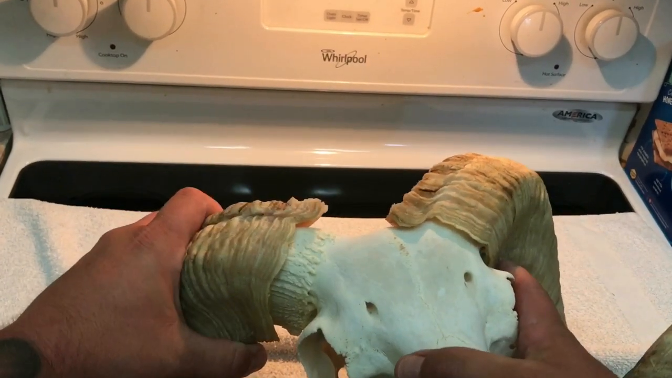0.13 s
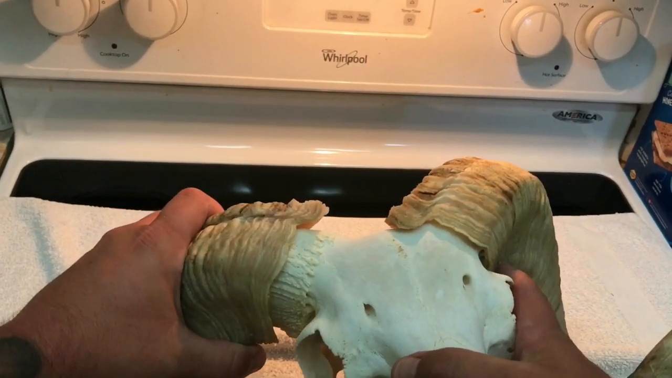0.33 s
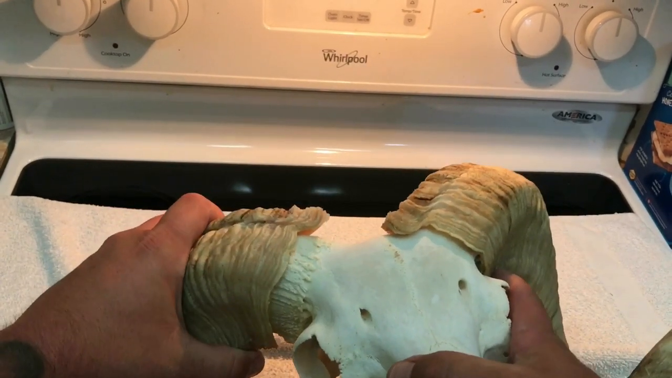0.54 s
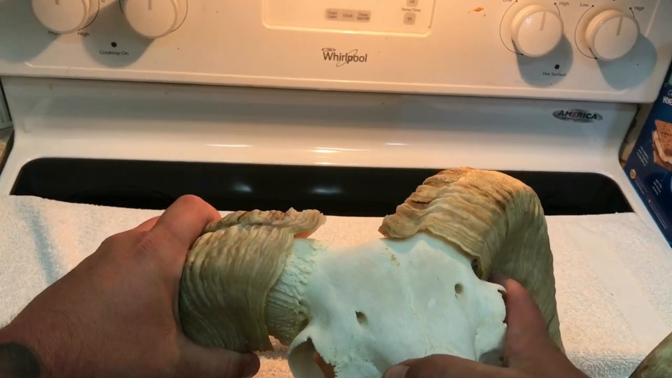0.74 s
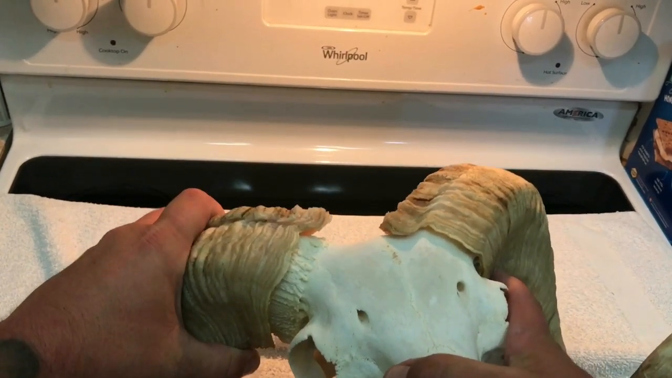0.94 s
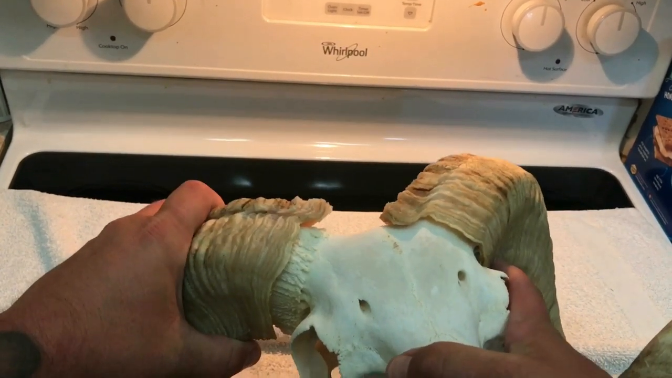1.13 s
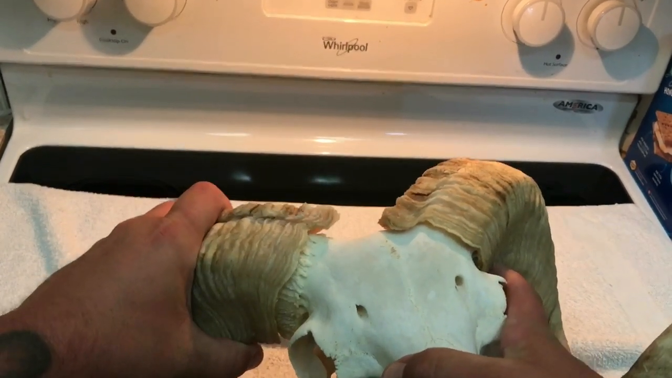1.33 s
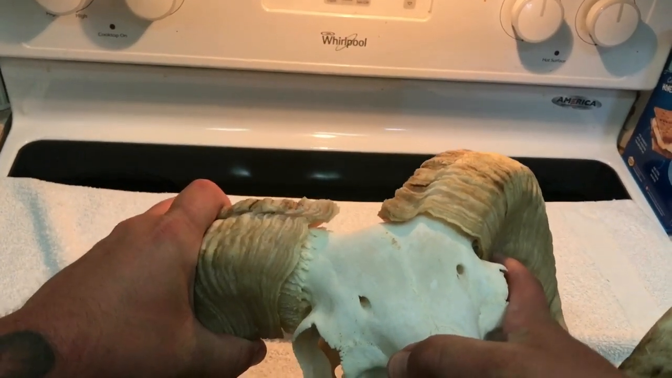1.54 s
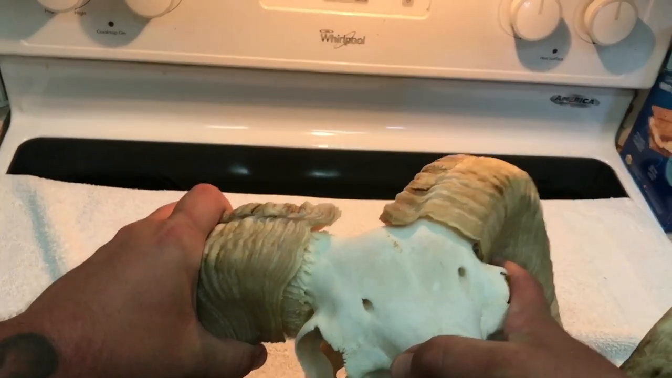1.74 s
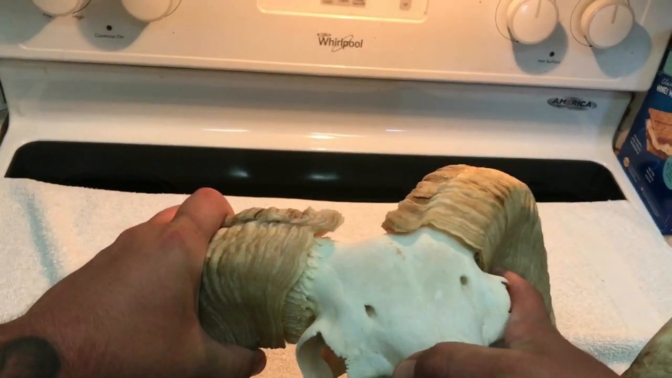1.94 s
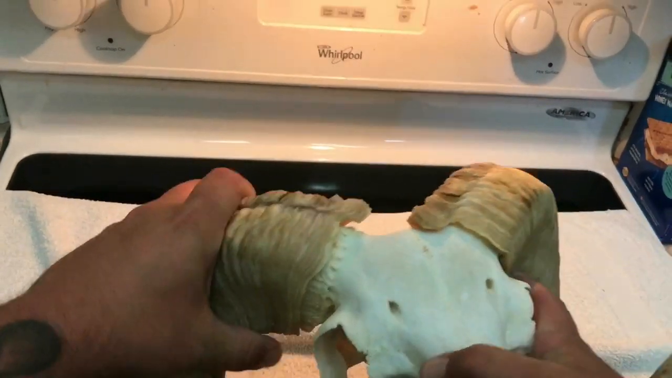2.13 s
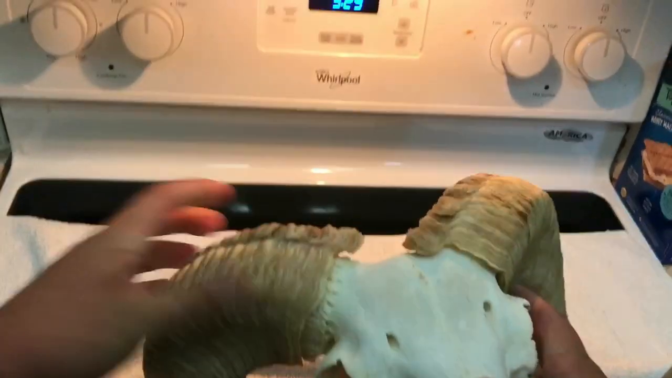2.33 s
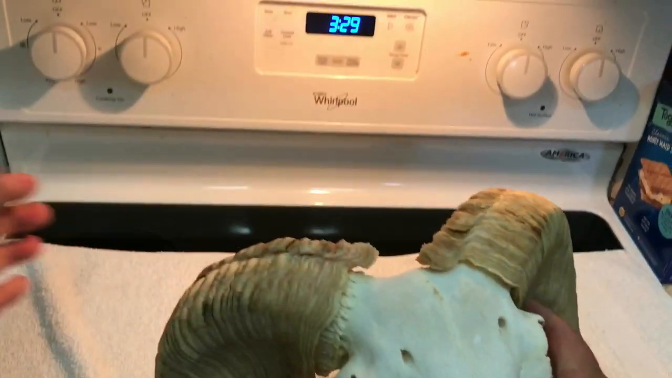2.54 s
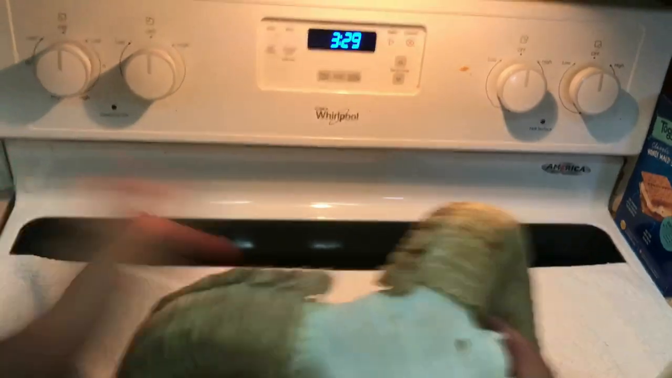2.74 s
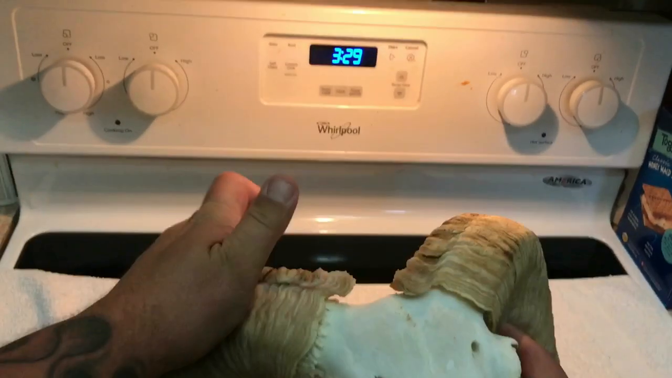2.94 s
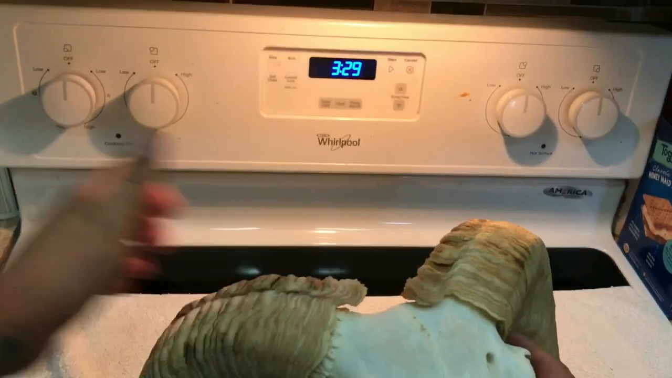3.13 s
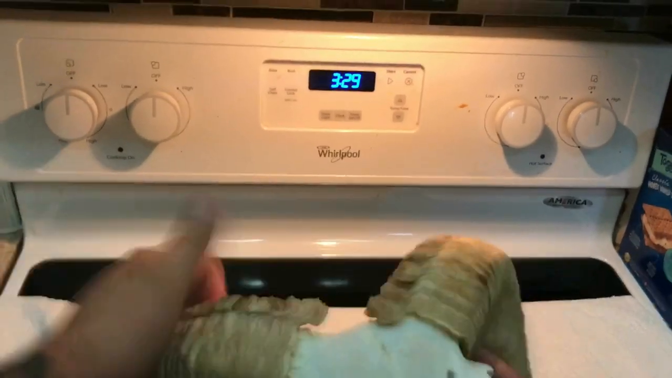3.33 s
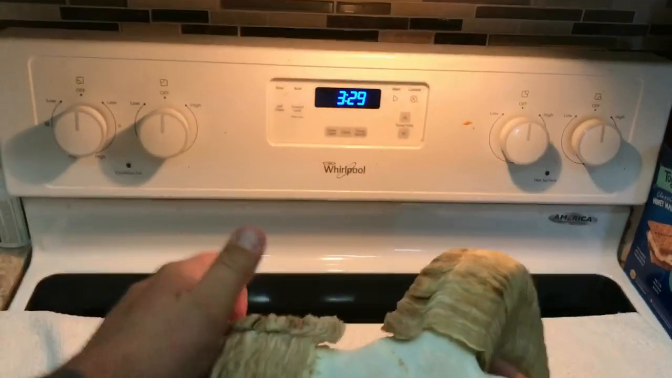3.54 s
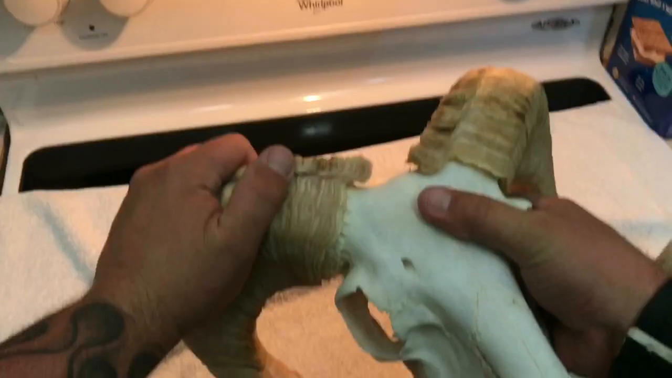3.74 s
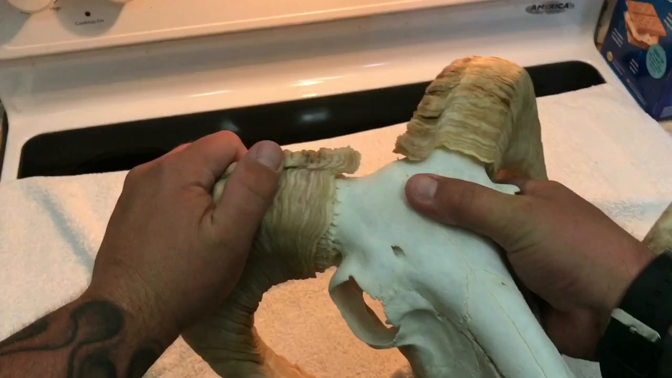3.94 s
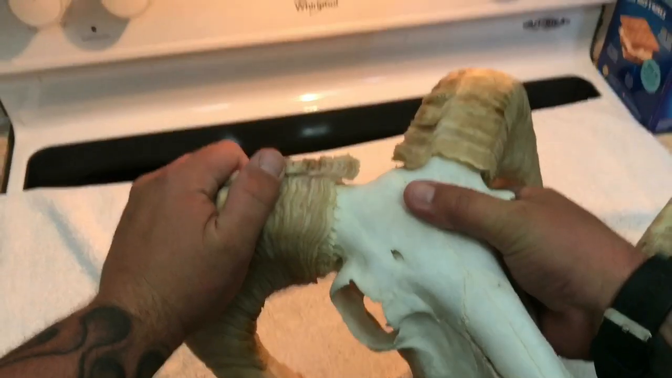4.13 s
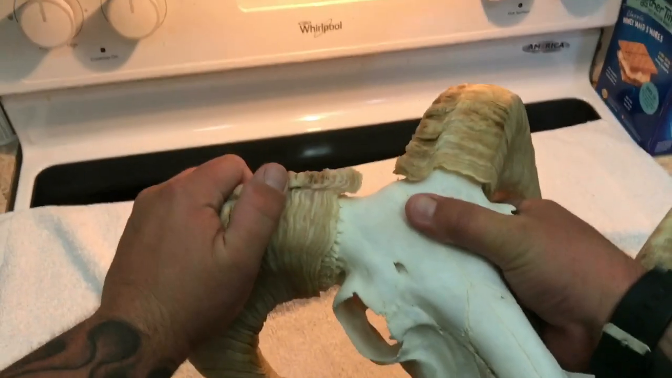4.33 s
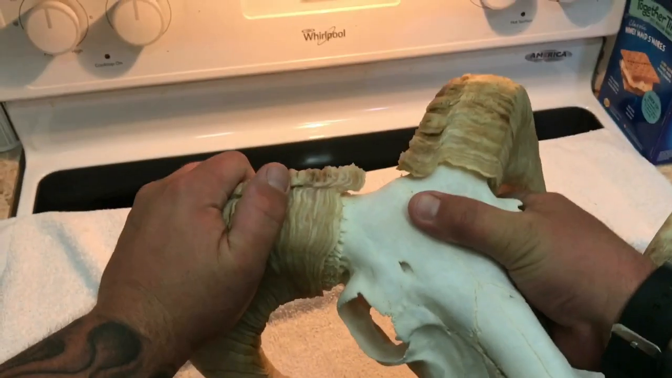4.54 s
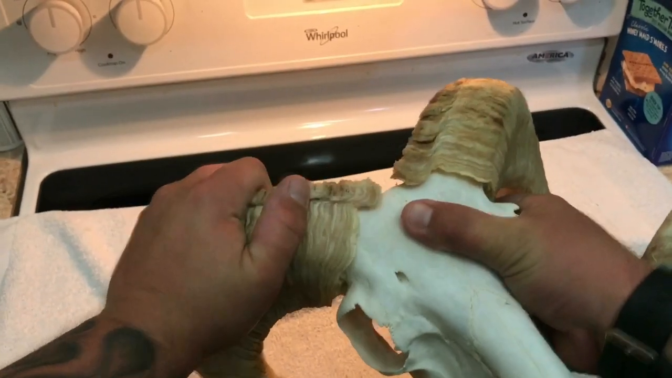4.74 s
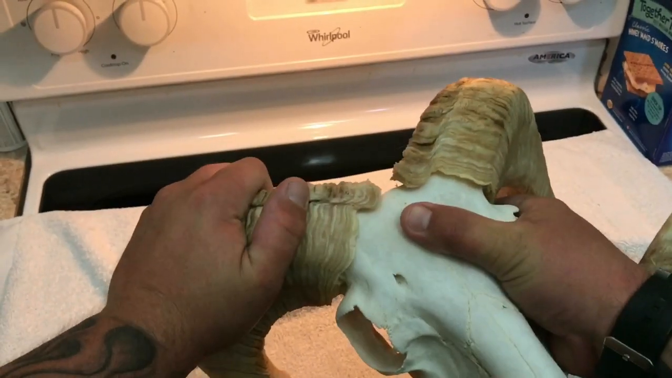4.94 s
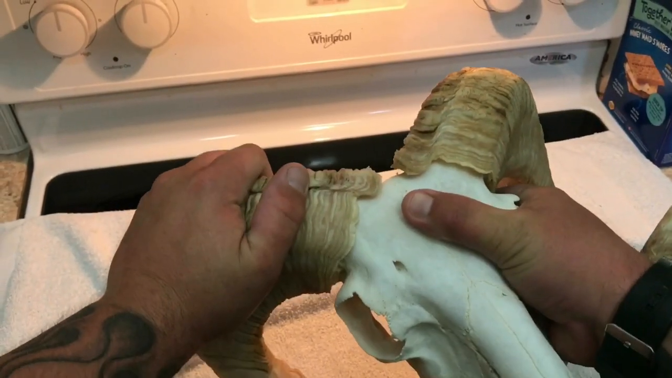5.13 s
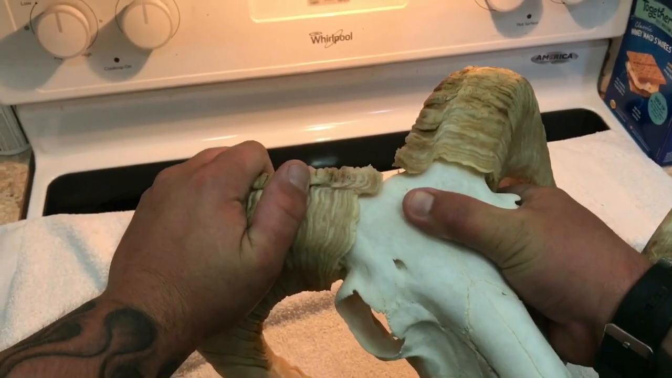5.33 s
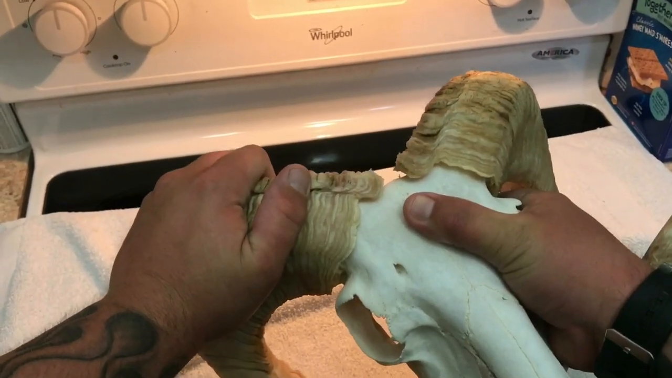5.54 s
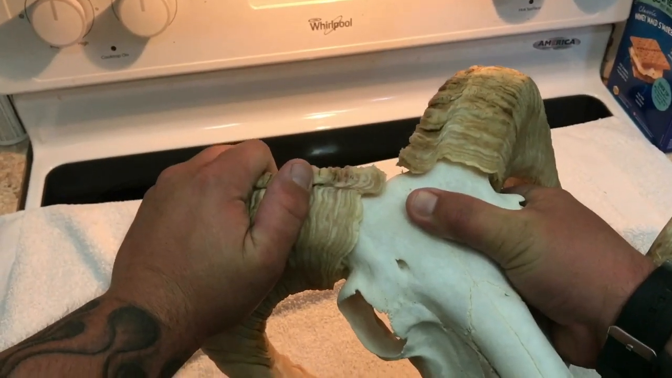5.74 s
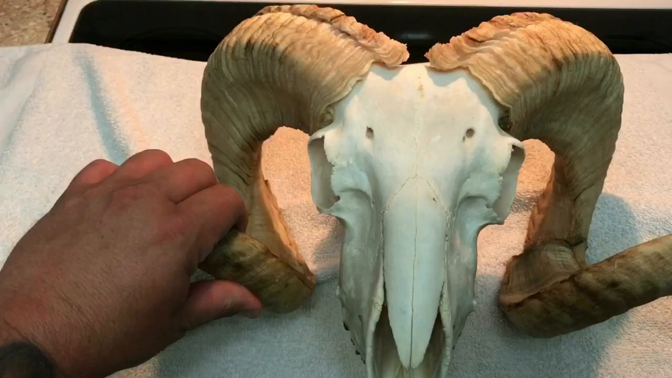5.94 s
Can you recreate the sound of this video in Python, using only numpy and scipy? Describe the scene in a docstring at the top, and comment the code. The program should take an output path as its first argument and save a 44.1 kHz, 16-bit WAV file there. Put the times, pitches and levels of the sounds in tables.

```python
"""A small kitchen: a dry horn sheath is worked onto the bony core of a skull on a towel on the stove.
Stick-slip on the bone makes it scrape, catching chips tick, and two palm slaps ring its hollow modes.
Twisted tight, it squeaks at the rim, then slides home with a knock. The stove top thumps under the load.
A refrigerator's compressor and fan hum behind it."""
import sys
import numpy as np
from scipy import signal
from scipy.fft import rfft, irfft, next_fast_len
from scipy.io import wavfile
from scipy.ndimage import map_coordinates

SR = 44100
rng = np.random.default_rng(int(sys.argv[2]) if len(sys.argv) > 2 else 0)


def int16_out(signal):
    """Quantize to a 16-bit WAV file."""
    q = np.round(np.clip(np.atleast_2d(signal).T, -1, 1) * 32767)
    wavfile.write(sys.argv[1], SR, q.astype(np.int16))


N = 264600

# Modes of the hollow sheath. Each row: frequency in Hz, width in Hz, loose level in dB, tight level in dB.
SHEATH_MODES = [ (143.6, 42, 2, -9), (242, 107, -1, -10.5), (351, 23, -16, 0), (496, 55, 4, -16),
                (575.6, 23.5, 6, -12.5), (660, 31, 1, -2.5), (763, 32, -13, -12), (884, 33, -3, -2.5),
                (1034, 26, -21, -10), (1210, 47, 9, -29), (1592, 26, 3.5, -19), (1770, 20, -10, -9),
                (2120, 110, -23, -3), (2574, 130, -41, 5), (2890, 190, -40, -9), (3130, 89, -27, -18),
                (3450, 100, -20, -27), (3850, 47, -35, -17.5), (4380, 96, -7, -20), (5100, 8.7, -39, -13),
                (5200, 19, -43, -21), (6300, 950, -19, -26), ]


def knocks():
    """Each blow rings the sheath; a tighter fit shifts the weight among its modes."""
    # Each row: start in seconds, gain in dB, contact cut-off in Hz, tightness from 0 to 1.
    blows = [ (2.897, 25.5, 6000, 0.37), (2.9004, 29.5, 476, 0.44), (2.914, 14.5, 890, 0.81),
             (3.4560, 13.5, 1130, 0.23), (3.4640, 16.5, 1300, 0.66), (4.834, 6, 1500, 0.98),
             (4.8766, 26, 1310, 0.87), ]
    out, impulse = np.zeros(N), signal.unit_impulse(SR // 4)
    for start_s, db, contact_hz, tight in blows:
        modes = [(hz, width_hz, loose_db + tight * (tight_db - loose_db) + rng.normal(0, 1))
                 for hz, width_hz, loose_db, tight_db in SHEATH_MODES]
        ring = filtered(impulse, lambda f: resonances(modes, f) / (1 + 1j * f / contact_hz) ** 2)
        add(out, start_s, amp(db) * ring)
    return out


def shoves(settle_after_s=0.03):
    """The sheath skids, crunches as it jams on the core, then creeps a little further."""
    # Each row: start and run-up in seconds, crunch, skid and settling levels in dB, tilt in dB/octave.
    pushes = [ (2.887, 0.0095, -24.5, -34.5, -45.5, -1.7), (3.4605, 0.0021, -29.5, -34.5, -59, 0),
              (4.8477, .0265, -21, -39, -61, -2), ]
    out, t = np.zeros(N), np.arange(SR // 3) / SR
    for start_s, run_up_s, crunch_db, skid_db, settle_db, tilt_db in pushes:
        build_s = 0.55 * run_up_s
        crunch_tilt_db = tilt_db - 1  # heavier contact is duller
        skid = stroke(t, rise_s=0.0019, hold_s=0.028, t60_s=0.064) * friction(t, tilt_db)
        crunch = stroke(t, build_s, hold_s=0.0032, t60_s=0.028) * friction(t, crunch_tilt_db)
        settle = stroke(t, rise_s=0.0084, hold_s=0.042, t60_s=0.075) * friction(t, tilt_db)
        add(out, start_s, amp(skid_db) * skid)
        add(out, start_s + run_up_s - build_s, amp(crunch_db) * crunch)
        add(out, start_s + settle_after_s, amp(settle_db) * settle)
    return out


def squeaks(hold_s=0.0027, t60_s=0.03, even_db=-58.5):
    """Slips ring the thin rim in a tight twist; a rasp starts earlier and outlasts the squeal."""
    # Each row: start in seconds, squeal level in dB, build-up in seconds.
    twists = [(2.108, -52.5, 0.0011), (3.852, -36, .008), (3.939, -54, .009), (3.955, -49.5, .054)]
    # Each row: frequency in Hz, width in Hz, level in dB.
    rim_modes = [(1790, 110, -18), (2820, 170, -4.5), (3310, 120, 1.5), (3450, 106, -1), (4220, 73, -9),
                 (5340, 110, -12.5), (6380, 170, -15.5), (8370, 300, -18)]
    out, t = np.zeros(N), np.arange(SR // 4) / SR
    for start_s, db, build_s in twists:
        squeal = unit(filtered(slips(t, rate_hz=1700, spread_db=0), lambda f: resonances(rim_modes, f)))
        add(out, start_s, amp(db) * stroke(t, build_s, hold_s, t60_s) * squeal)
        rasp_db = even_db + 0.39 * (db - even_db)
        rasp_build_s = 2.3 * build_s
        pressure = stroke(t, rasp_build_s, hold_s, 2.1 * t60_s)
        add(out, start_s + build_s - rasp_build_s, amp(rasp_db) * pressure * friction(t, tilt_db=-0.6))
    return out


def scrapes():
    """The sheath drags over bone; a longer stroke builds and lets go more slowly."""
    # Each row: start in seconds, level in dB, length in seconds, tilt in dB/octave.
    drags = [ (0.033, -69, 0.084, -1), (0.332, -66, 0.014, -2), (0.510, -55.5, 0.033, -3.5),
             (0.911, -48.5, 0.024, -2), (1.346, -40.5, 0.025, -3), (2.176, -62.5, 0.035, -2),
             (2.241, -64.5, 0.071, -1.5), (2.328, -55, 0.039, 1.5), (3.11, -59.5, 0.033, -1),
             (3.528, -62.5, .06, -2.5), (3.700, -55, 0.022, 1), (3.738, -65, .045, 5),
             (4.481, -61, 0.25, -4), ]
    out, t = np.zeros(N), np.arange(SR // 2) / SR
    for start_s, db, length_s, tilt_db in drags:
        rise_s = 0.0049 + 0.2 * length_s
        pressure = stroke(t, rise_s, hold_s=max(length_s - rise_s, 0), t60_s=0.017 + 1.5 * length_s)
        add(out, start_s, amp(db) * pressure * friction(t, tilt_db))
    return out


def ticks(ref_t60_s=0.022, ref_db=-49.5, doubling_db=8):
    """A chip catches and snaps free; louder chips sound for longer."""
    # Each row: start in seconds, level in dB, tilt in dB/octave.
    chips = [(1.455, -50.5, -1), (2.1085, -46, -1.5), (2.397, -57, 8), (4.552, -49.5, 0),
             (4.724, -50.5, -1.5), (4.75, -52, -3), (4.833, -38, -6)]
    out, t = np.zeros(N), np.arange(SR // 10) / SR
    for start_s, db, tilt_db in chips:
        t60_s = ref_t60_s * 2 ** ((db - ref_db) / doubling_db)
        add(out, start_s, amp(db - 60 * t / t60_s) * rasp(rng.standard_normal(len(t)), tilt_db))
    return out


def stroke(t, rise_s, hold_s, t60_s, start_db=-22):
    """Pressure builds, is held, then lets go."""
    swell_db = start_db * np.clip(1 - t / rise_s, 0, 1)
    fall_db = -60 * np.maximum(t - rise_s - hold_s, 0) / t60_s
    return amp(swell_db + fall_db)


def friction(t, tilt_db):
    """Ridged horn on bone: dense slips on a fine hiss, rms 1."""
    force = slips(t, rate_hz=3000, spread_db=1.0) + amp(-8.5) * rng.standard_normal(len(t))
    return rasp(force, tilt_db)


def slips(t, rate_hz, spread_db):
    """Tiny stick-slip jerks at random moments, rms 1."""
    slipping = rng.random(len(t)) < rate_hz / SR
    size_db = spread_db * np.clip(rng.standard_normal(len(t)), -2, 2)
    direction = np.sign(rng.standard_normal(len(t)))
    return unit(slipping * direction * amp(size_db))


def rasp(force, tilt_db):
    """Dry keratin's colour, tilted by tilt_db per octave above 500 Hz, rms 1."""
    # Each row: frequency in Hz, relative density in dB.
    keratin_spectrum = [(100, -18), (400, -2), (900, 1), (2200, -0.5), (4000, -0.5), (6500, -2),
                        (7800, -6.5), (9200, -2), (10400, -6), (12500, -2.5), (16000, -4.5)]
    octaves = lambda f: np.log2(np.maximum(f, 500) / 4000)
    return unit(filtered(force, lambda f: amp(along(keratin_spectrum, f) + tilt_db * octaves(f))))


def hollow(x, ring=0.3, trim_db=-0.85):
    """Whatever rubs the sheath is reinforced at its modes."""
    body = lambda f: 1 + ring * sum(resonances([(hz, width_hz, 0)], f) for hz, width_hz, *_ in SHEATH_MODES)
    return amp(trim_db) * filtered(x, body)


def thumps(attack_s=0.0017):
    """The towel passes only a soft push to the sheet-metal stove top."""
    # Each row: start in seconds, gain in dB, t60 in seconds.
    loads = [(2.898, -13, 0.028), (3.468, -20, 0.12), (4.877, -32, 0.054)]
    # Each row: frequency in Hz, level in dB.
    stove_modes = [(59, -0.5), (114, -6.5)]
    out, t = np.zeros(N), np.arange(SR // 2) / SR
    top = sum(amp(db) * np.sin(2 * np.pi * hz * t) for hz, db in stove_modes)
    for start_s, db, t60_s in loads:
        envelope = amp(db - 60 * t / t60_s) * (1 - np.exp(-t / attack_s))
        add(out, start_s, -envelope * top)
    return out


def kitchen(x, cutoff_hz=8000):
    """The room's diffuse echo; each frequency dies at its own speed."""
    # Each row: frequency in Hz, t60 in seconds.
    decay_times = [(150, 0.43), (1000, 0.5), (4000, 0.6), (14000, 0.53)]
    hz, t, noise = signal.stft(rng.standard_normal(SR // 2), SR, nperseg=256)
    decay = amp(-60 * t / along(decay_times, hz)[:, None])
    tail = signal.istft(noise * decay, SR, nperseg=256)[1]
    tail = filtered(tail / np.linalg.norm(tail), lambda f: 1 / (1 + 1j * f / cutoff_hz))
    return signal.fftconvolve(x, np.pad(tail, (SR // 300, 0)))[:N]  # 3.3 ms pre-delay


def refrigerator(air_db=-50, swell_db=0.43):
    """Compressor buzz and fan tones over the rush of moving air."""
    # Each row of both: multiple of the shaft rate, level in dB.
    compressor_orders = [(1, -50), (2, -59.5), (3, -68.5), (4, -63.5), (6, -65.5), (7, -74), (9, -75.5),
                         (10, -81), (11, -76.5), (12, -80.5), (13, -80), (16, -79), (18, -75.5), (19, -93),
                         (20, -83), (21, -89.5), (22, -86), (23, -91), (24, -84), (25, -85.5), (29, -86.5)]
    fan_orders = [(3, -81), (4, -67.5), (5, -73), (6, -70), (7, -71)]
    # Each row: frequency in Hz, relative density in dB.
    air_spectrum = [(20, -19), (36, -11.5), (45, -4), (62, 0), (72, -3), (83, 3.5), (100, -8), (128, -8),
                    (155, -12), (232, -7.5), (270, -12), (400, -16.5), (480, -22), (660, -22), (760, -29.5),
                    (900, -25.5), (1200, -30.5), (1900, -39), (5000, -45), (7000, -47), (10300, -51.5),
                    (12500, -48), (16000, -51.5)]
    air = unit(filtered(rng.standard_normal(N), lambda f: amp(along(air_spectrum, f))))
    tones = motor(compressor_orders, shaft_hz=58.9) + motor(fan_orders, shaft_hz=56.1)
    return tones + amp(air_db - swell_db * wobble(4.7)) * air


def motor(orders, shaft_hz, waver_db=1.0, drift_rad=0.02):
    """Harmonics locked to one slightly unsteady shaft."""
    angle = 2 * np.pi * shaft_hz * np.arange(N) / SR + drift_rad * wobble(2.03)
    tone = lambda k: np.sqrt(2) * np.sin(k * angle + 2 * np.pi * rng.random())
    return sum(amp(db + waver_db * wobble(3.93)) * tone(k) for k, db in orders)


def amp(db):
    """Decibels to gain."""
    return 10 ** (np.asarray(db) / 20)


def unit(x):
    """Scale to rms 1."""
    return x / np.sqrt(np.mean(x ** 2) + 1e-20)


def along(points, hz):
    """(Hz, value) points read on a log axis."""
    knots_hz, values = np.transpose(points)
    return np.interp(np.log(hz + 1), np.log(knots_hz), values)


def wobble(rate_hz):
    """A smooth random curve, rate_hz knots a second."""
    knots = rng.standard_normal(int(N * rate_hz / SR) + 4)
    return map_coordinates(knots, [np.arange(N) * rate_hz / SR])


def filtered(x, response):
    """x through a complex response of frequency."""
    size = next_fast_len(len(x) + SR // 10)
    return irfft(rfft(x, size) * response(np.fft.rfftfreq(size, 1 / SR)), size)[:len(x)]


def resonances(modes, f):
    """Causal response of (Hz, width in Hz, dB) modes of alternating sign."""
    return sum((-1) ** k * amp(db) * 1j * f * width_hz / (hz * hz - f * f + 1j * f * width_hz)
               for k, (hz, width_hz, db) in enumerate(modes))


def add(track, start_s, sound):
    """Mix a sound into the track."""
    part = track[round(start_s * SR):][:len(sound)]
    part += sound[:len(part)]


def scene(echo_db=-16.5):
    """Close handling noises, their echo, the stove top and the hum."""
    handling = hollow(scrapes() + shoves() + ticks()) + squeaks() + knocks()
    return (handling + amp(echo_db) * kitchen(handling) + thumps() + refrigerator())[None]


def record(dry, low_cut_hz=34, top_hz=15800, dip_at_s=3.826, dip_half_s=0.023, dip_db=-22.5):
    """One brief dip in level, the microphone's low cut and the band limit."""
    dip = np.maximum(1 - np.abs(np.arange(N) / SR - dip_at_s) / dip_half_s, 0)
    dipped = dry[0] * amp(dip_db * dip)
    low_cut = signal.butter(2, low_cut_hz, "highpass", fs=SR, output="sos")
    return filtered(signal.sosfilt(low_cut, dipped), lambda f: f < top_hz)[None]


dry = scene()
out = record(dry)
int16_out(out)
```